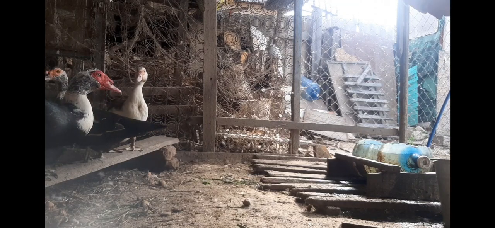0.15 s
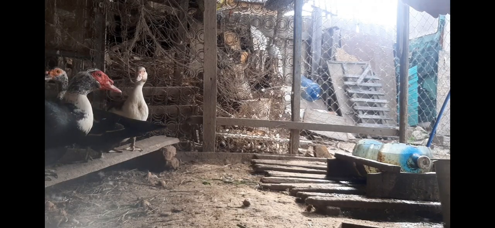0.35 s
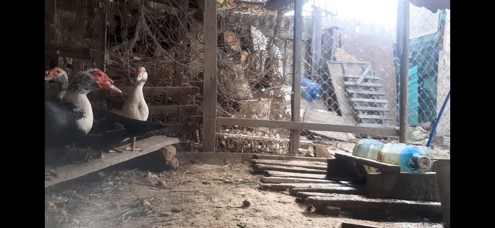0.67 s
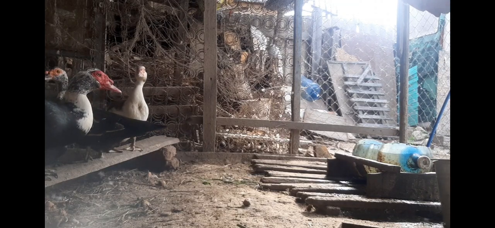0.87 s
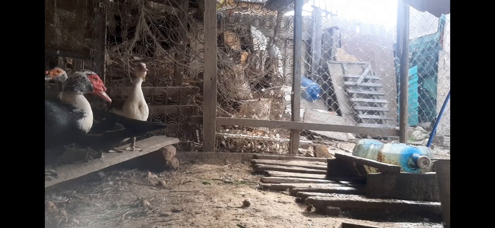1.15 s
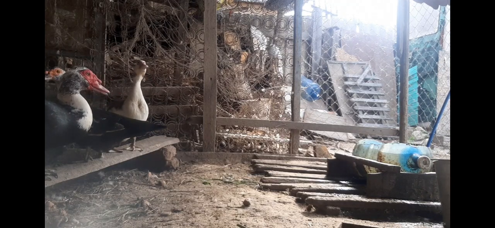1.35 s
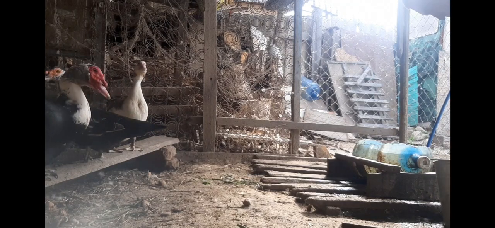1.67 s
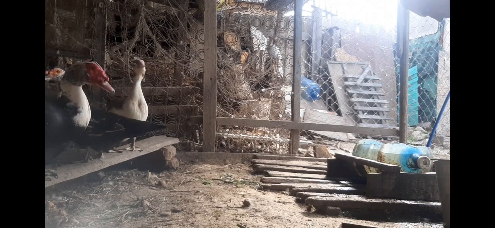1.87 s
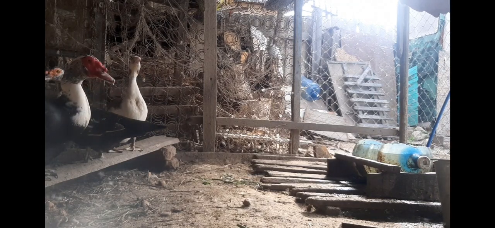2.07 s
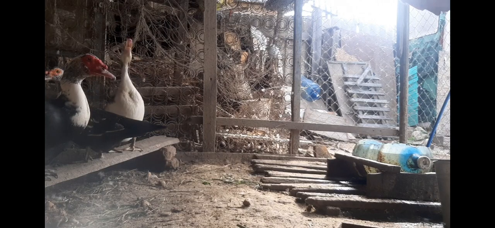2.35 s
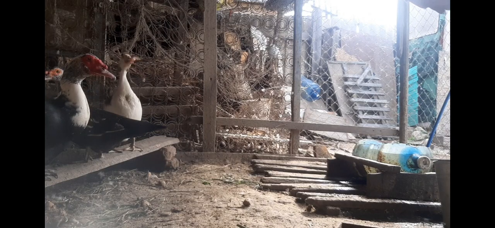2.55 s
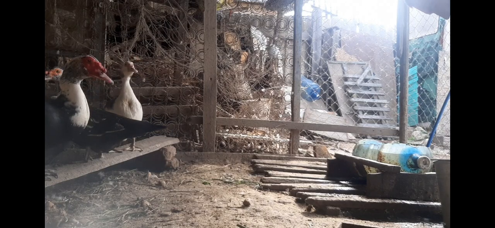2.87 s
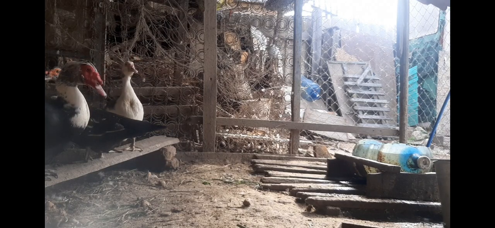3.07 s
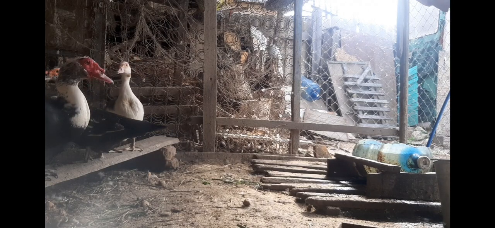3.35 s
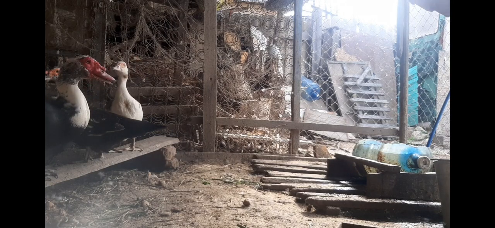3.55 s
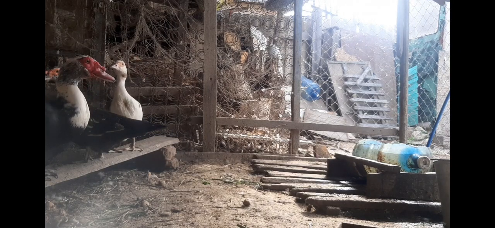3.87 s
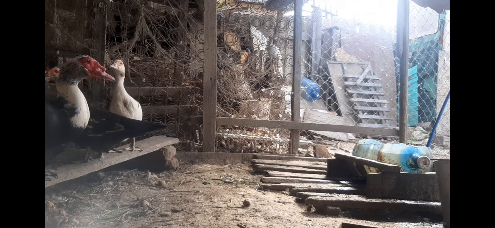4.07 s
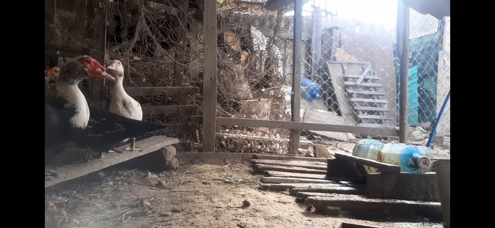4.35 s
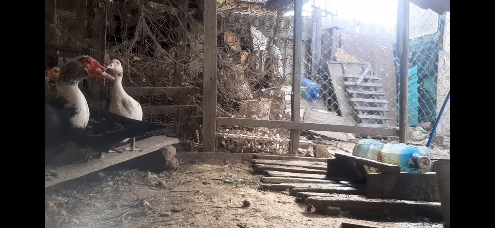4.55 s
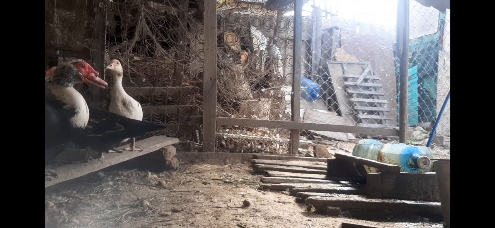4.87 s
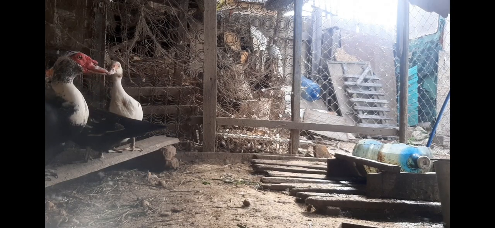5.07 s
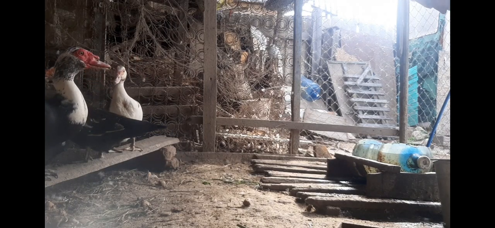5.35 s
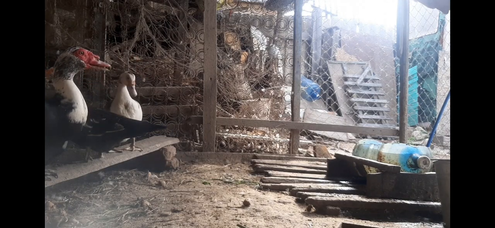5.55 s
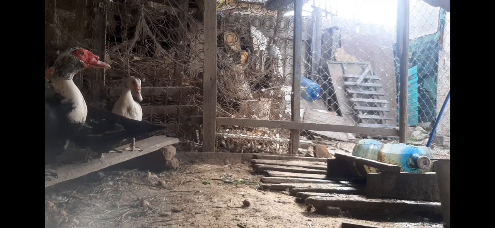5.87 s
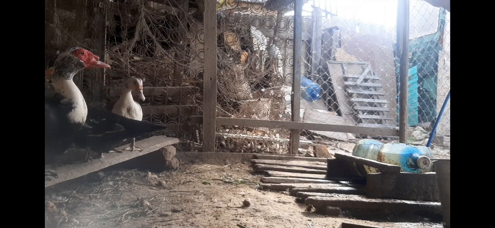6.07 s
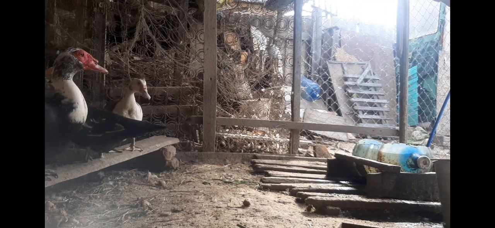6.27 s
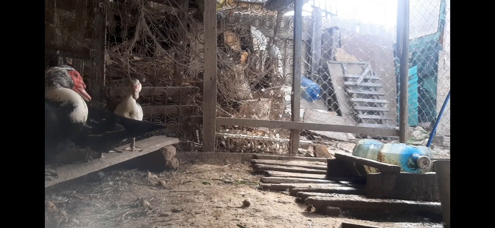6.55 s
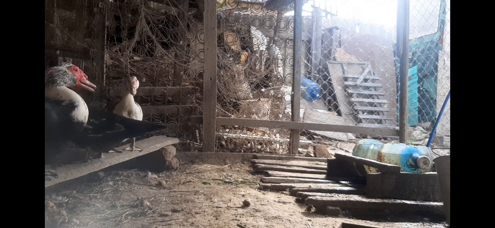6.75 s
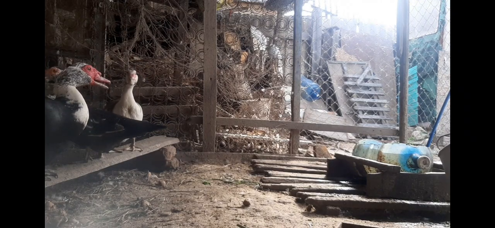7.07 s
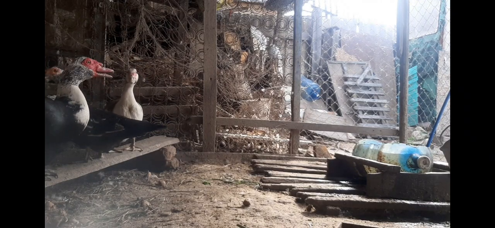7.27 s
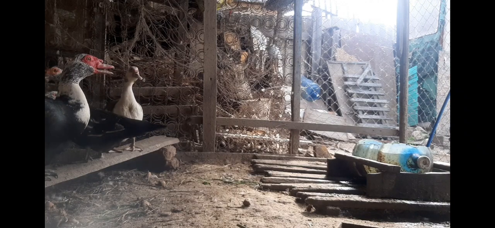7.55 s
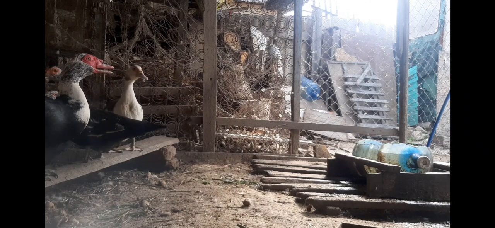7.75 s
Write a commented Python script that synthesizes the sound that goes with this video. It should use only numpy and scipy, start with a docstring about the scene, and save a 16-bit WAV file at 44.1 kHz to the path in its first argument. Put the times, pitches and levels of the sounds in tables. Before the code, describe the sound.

Close by, slightly right, a scoop stirs dry animal feed in a plastic tub: uneven gritty swishes, crunches and dull knocks, with tiny stray kernel ticks. After a quieter middle and a soft floor thump, five hollow raps on the rim end it, the last four much louder. Faint bird-like peeps and a distant low rumble sit behind. Stereo pickup in a small, dry wooden shed.

```python
"""Inside a wooden shed, feed is stirred by hand in a plastic tub close by, a little right of the microphones.
Noise-like clicks make the grain that slides and crunches with the strokes and settles after raps;
short noisy rings are stray kernels. The scoop knocks the tub, then raps its rim five times:
decaying wall modes with a slap and a crack. The floor thumps once in slow sines; narrow noise makes
faint peeps and low murmurs. Low noise rumbles and a wavering sine pair hums far off beneath it all."""
import sys
import numpy as np
from scipy import signal
from scipy.fft import rfft, irfft
from scipy.io import wavfile

SR = 44100
rng = np.random.default_rng(int(sys.argv[2]) if len(sys.argv) > 2 else 0)


def generate_wav(sig):
    """Save sig (samples, or channels by samples) to the path in sys.argv[1] as 16-bit PCM at SR."""
    pcm = np.round(np.clip(np.atleast_2d(sig).T, -1, 1) * 32767).astype(np.int16)
    wavfile.write(sys.argv[1], SR, pcm)


N = 348816

# low outdoor rumble over time: (t/s, rms level/dB)
RUMBLE_LEVEL = [(0, -56.5), (1.43, -62.5), (1.94, -57.5), (2.58, -63), (3.33, -58), (4.85, -57), (5.0, -54),
                (5.48, -53), (5.86, -60.5), (6.28, -58.5), (6.96, -57), (7.53, -53.5), (7.91, -51)]
# rumble spectrum: (f/Hz, level/dB per Hz)
RUMBLE_TONE = [(20, -63), (32, -39), (42, -1), (52, 3), (70, 5.5), (100, 1.5), (125, -7), (200, -23),
               (400, -69)]
# hum of a far machine: (t/s, centre f/Hz, rms level/dB, rms level of its octave/dB)
FAR_HUM = [(0, 48, -58, -62), (.8, 48, -57.5, -56.5), (.9, 48.03, -57, -69), (1.45, 47.95, -60, -68),
           (1.78, 48.96, -58, -58), (1.98, 49, -66, -68), (2.5, 49, -60.5, -67), (3.74, 49, -55.5, -67),
           (3.96, 51, -62, -70), (4.7, 49, -63, -65), (5.0, 49, -51.5, -58.5), (5.6, 49.5, -55, -59),
           (6.3, 51.06, -57.5, -71.5), (6.69, 52.06, -63, -74), (7.23, 52, -52.5, -64),
           (7.91, 52, -57, -66)]
# feed trickling between the swells: (t/s, grain level/dB, low crunch against grain/dB)
TRICKLE = [(0, -50, 9.5), (.6, -57.5, 3.5), (.85, -55, -14.5), (1.25, -52.5, -6.5), (1.42, -56.5, -5.5),
           (1.9, -54, 2), (2.42, -58.5, 0), (2.55, -52.5, -18), (3.2, -56.5, -2), (3.35, -53, -3),
           (3.6, -58.5, 2), (3.8, -52, -1.5), (4.2, -54.5, -8.5), (4.8, -55, -0.5), (4.93, -53, -1.5),
           (5.75, -56.5, -1), (5.9, -53, -6.5), (6.4, -54, -3), (6.72, -56, -1), (7.1, -58.5, 4),
           (7.43, -55.5, -1.5), (7.85, -54, 3.5)]
# swells of sliding feed: strokes, and feed settling after the raps: (t at full strength/s, rise/s,
# hold/s, fall/s, grain level/dB, low crunch against grain/dB)
SLIDES = [(0.064, 0.11, .01, 0.075, -35.5, -19), (0.327, 0.13, 0.13, 0.055, -41, 0),
          (0.538, 0.03, 0.0084, 0.033, -41, -3), (0.713, 0.14, .02, 0.22, -51, -2),
          (1.11, 0.11, 0.012, 0.058, -58.5, 13), (1.624, 0.042, 0.023, 0.22, -46, -3.5),
          (1.76, 0.054, 0.0068, 0.03, -34.5, -10), (1.82, .05, 0.054, 0.21, -54, 4),
          (2.043, 0.059, .06, 0.17, -46, -2), (2.173, 0.24, 0.023, 0.079, -42, -1.5),
          (2.292, 0.039, .01, 0.084, -51, -6), (2.65, 0.081, 0.0092, 0.11, -52, 7.5),
          (2.771, 0.016, 0.031, 0.095, -37, -4.5), (2.943, 0.084, .02, 0.16, -48, 2),
          (3.096, 0.14, 0.014, 0.04, -41, -7.5), (3.469, 0.082, 0.013, 0.1, -44.5, 2.5),
          (3.98, 0.053, .01, 0.22, -47.5, 5), (4.466, 0.13, 0.047, 0.13, -42.5, -6),
          (5.007, .02, .02, 0.13, -43.5, 1), (5.051, 0.037, .01, 0.098, -35, -8),
          (5.2, .1, 0.11, .15, -48, -3), (5.419, 0.088, 0.089, 0.07, -37, -6.5),
          (5.583, 0.11, 0.023, 0.061, -51.5, 6.5), (5.955, 0.025, .01, 0.094, -48.5, 0),
          (6.038, .06, 0.018, 0.14, -48.5, -13), (6.688, 0.084, 0.033, 0.075, -55.5, 7.5),
          (6.964, 0.16, 0.013, 0.096, -48.5, 0.5), (7.184, 0.037, 0.017, 0.034, -54.5, 14),
          (7.29, 0.028, 0.014, 0.049, -56.5, -12), (7.398, .05, 0.022, 0.036, -49, 10.5),
          (7.62, 0.081, 0.024, 0.049, -52.5, 12), (7.9, 0.16, .02, .1, -55, 15)]
# spectrum of the sliding feed: (f/Hz, level/dB per Hz)
GRAIN_TONE = [(100, -47), (250, -13.5), (500, -11.5), (1000, -6), (1600, -7.5), (2400, -1.5), (3500, -2.5),
              (5500, -3), (9000, -6), (16000, 1.5)]
# modes of the tub wall: (f/Hz, base level/dB, base t60/s)
TUB_MODES = [(153.5, -9, 0.073), (202, -9, 0.059), (275.6, -6, 0.06), (338.4, -3.5, 0.054),
             (393, 0.5, 0.048), (449, 3, 0.023), (588, -5, 0.051), (690, 2.5, 0.041), (894, 7, 0.014),
             (1012, -10.5, 0.11), (1094, -3.5, 0.043), (1381, 2, 0.012), (1534, 4.5, 0.026),
             (1790, -25, 0.042), (2037, 3.5, 0.027), (2350, -1, 0.024), (2624, 3, 0.013),
             (3114, -11, 0.062), (3433, 1, 0.03), (4300, 14, 0.026), (4320, -11, 0.03), (4800, -2, 0.03),
             (5400, -10, 0.025), (5800, -18, .04)]
# scoop on the tub: (t/s, level/dB, favoured f/Hz, far low modes/dB, middle modes/dB, crack/dB,
# ring-time factor, left against right/dB)
KNOCKS = [(.058, -20, 330, -18, -17, -25.5, 0.78, -3), (.337, -37.5, 700, -16, 3.5, -4.5, 0.39, -1),
          (.536, -33.5, 1000, -19, 1, -11, 0.46, -1.5), (1.021, -46, 1010, -23, -2, -26, 0.8, -5),
          (1.096, -37.5, 1082, -10, -3.5, -35, 0.61, -6), (1.594, -27, 402, -31, -20.5, -28.5, 0.98, -7),
          (1.715, -38.5, 369, -14, -8, -8, 0.86, -3), (1.752, -18, 322, -18.5, -13, -25, 0.81, -5.5),
          (2.292, -46, 611, -15, -3, -11.5, 0.86, -1), (2.473, -63, 660, -10, -14, -18, 0.52, -3),
          (2.628, -50, 685, -7, -13, -8, 0.97, 1), (2.761, -38, 690, 5.5, -1, -11, 0.44, -4),
          (2.782, -17, 328, -30, -18.5, -33, 0.66, -5.5), (3.426, -31.5, 340, -11, -10, -19.5, 0.47, -2),
          (3.969, -41, 695, -3, -20, -10.5, 1, -2), (4.983, -22, 398, -8, -13.5, -21.5, 0.75, -4.5),
          (5.068, -31, 337, -26, -18, -28, 0.86, -3), (5.394, -25, 416, -14, -10, -27, 0.6, -6),
          (5.952, -42.5, 510, -8.5, 2, -1, 0.8, -5), (6.24, -50.5, 288, -19, -26, -8, 0.87, -1),
          (6.717, -49, 900, -24, -5, -33, 0.92, -2), (6.913, -25, 640, -2, -10, -25, 0.76, -4),
          (7.12, -11.5, 448, -9, -11.5, -21, 0.83, -4), (7.335, -7, 467, -7.5, -15, -27, 0.71, -2.5),
          (7.551, -9, 474, -9, -8.5, -22, 0.75, -2), (7.778, -5.5, 1140, -11, -7, -31, 0.53, -2)]
# lone kernels, short noisy rings each at one pitch: (t/s, f/Hz, peak level/dB)
PINGS = [(.72, 680, -45.5), (.87, 1338, -48), (1.323, 4780, -46), (1.533, 3316, -47), (1.936, 3150, -44),
         (2.081, 1010, -38.5), (2.125, 2120, -39.5), (2.472, 3100, -43), (2.649, 1540, -46),
         (3.066, 1540, -38.5), (3.18, 2090, -43), (3.311, 3620, -45.5), (3.35, 3404, -43.5),
         (3.484, 1330, -45), (3.875, 732, -48), (4.33, 680, -48), (4.869, 1291, -46), (5.39, 2248, -34),
         (5.41, 2500, -34), (5.44, 1540, -36), (5.445, 2100, -39), (5.486, 1540, -33), (5.495, 2300, -37),
         (6.111, 590, -43), (6.246, 3500, -46), (6.714, 3170, -35)]
# faint hoarse peeps and low murmurs, narrow noise swells:
# (t/s, length/s, centre f/Hz, rms level before its swell/dB)
PEEPS_AND_MURMURS = [(0.755, .04, 2600, -54.5), (1.015, 0.047, 1700, -53), (1.421, .08, 1950, -59),
                     (6.026, .06, 1147, -52.5), (6.192, .04, 1800, -55.5), (1.47, 0.089, 3350, -62),
                     (2.515, 0.032, 3700, -49), (3.31, .07, 3600, -68), (4.8, .06, 3890, -54),
                     (5.57, 0.08, 3770, -48), (5.685, 0.032, 3310, -52.5), (5.82, .03, 3600, -61),
                     (5.865, 0.06, 3600, -51.5), (6.27, 0.026, 3220, -62), (6.95, 0.046, 3400, -53),
                     (7.29, .03, 3450, -52), (7.64, .04, 2800, -50), (7.86, 0.058, 2900, -48)]
# dull thumps through the floor: (t/s, f/Hz, level/dB)
THUMPS = [(6.459, 71.2, -33), (6.49, 68.4, -19.5), (6.526, 83, -24.5)]
# microphone response: (f/Hz, level/dB)
MIC_RESPONSE = [(20, 1), (6200, 3), (7200, -3.5), (7900, -15.5), (8600, -43.5), (9500, -22.5),
                (11000, -14.5), (13000, -12.5), (15000, -14), (22050, -33)]

LEFT_DB, LEFT_LAG = -6, 8   # left port against the right: level/dB, delay/samples
SHED_T60_S, SHED_LEFT_DB = 0.13, -4   # reflections: decay, left port against the right
KNOCK_SHED_DB = 1.5   # reflections against the direct knock
RUMBLE_WAVER_DB, RUMBLE_WAVER_HZ = 1.0, 5
HUM_WAVER_DB, HUM_WAVER_HZ = 2.5, 1.22   # spread of level and of pitch
SWELL_DB = 15   # a slide gains this over its rise and loses it over its fall
TRICKLE_WAVER_DB, CRUNCH_WAVER_DB = 1.2, 2.2
PATCHY_DB = 1.8   # spread of each grain band's own swelling
WALL_HUM_DB = -17   # middle wall modes under the sliding grain, against the grain
SPLIT_HZ = 29   # roughness: random spread of each blow's twin-mode offset at 500 Hz
FAINT_PINGS_PER_S, FAINT_PING_DB = 16, -49   # random pings: rate, loudest level
PING_CYCLES, SKITTER_S = 60, 0.0082   # longest ring (t60) in cycles, fade of the skitter
PEEP_WIDTH = 0.1   # share of the pitch, to either side
CUTOFF_HZ = 15700


def from_db(db):
    """Decibels to gain."""
    return 10 ** (np.asarray(db) / 20)


def rms_one(x):
    """Scale to rms 1."""
    return x / np.sqrt(np.mean(np.square(x)) + 1e-20)


def in_time(rows):
    """Columns of a time curve, joined by straight lines to one value per sample."""
    s, *columns = np.transpose(rows)
    return [np.interp(np.arange(N) / SR, s, c) for c in columns]


def drift(rate):
    """Slow chance of rms 1: noise through two low-pass poles at the rate (Hz)."""
    r = np.exp(-2 * np.pi * rate / SR)
    wander = signal.lfilter([1], [1, -2 * r, r * r], rng.standard_normal(N + SR))
    return rms_one(wander[SR:])


def colour(x, points):
    """Causal (minimum-phase) filter through (f/Hz, level/dB) points."""
    hz, db = np.transpose(points)
    grid = np.linspace(1, SR / 2, 4097)
    log_gain = np.interp(np.log(grid), np.log(hz), db) * np.log(10) / 20
    cepstrum = irfft(log_gain)
    # fold the cepstrum onto positive time
    cepstrum[1:4096] *= 2
    cepstrum[4097:] = 0
    response = irfft(np.exp(rfft(cepstrum)))
    return signal.oaconvolve(x, response[None], axes=-1)[:, :N]


def band(x, low_hz, high_hz):
    """Band-pass."""
    return signal.sosfilt(signal.butter(2, [low_hz, high_hz], "band", fs=SR, output="sos"), x)


def ring(clicks, hz, t60):
    """Two-pole resonance: a unit click sets a decaying sine of starting height 1 ringing."""
    r, w = from_db(-60 / (t60 * SR)), 2 * np.pi * hz / SR
    return signal.lfilter([0, np.sin(w)], [1, -2 * r * np.cos(w), r * r], clicks + 1e-18)


def placed(x):
    """The source is nearer the right port: the left one hears it later and softer."""
    return np.array([from_db(LEFT_DB) * np.roll(x[0], LEFT_LAG), x[1]])


def shed(x, wet_db):
    """Dense reflections off planks and clutter, different at each port, weak and alike in the bass."""
    t = np.arange(SR // 3) / SR
    noise = rng.standard_normal((3, len(t)))
    shared = from_db(-7.5) * band(noise[0], 120, 607)
    own = band(noise[1:], 690, 13800)
    decay = from_db(-60 * t / SHED_T60_S) * (1 - np.exp(-t / 0.0014))
    echoes = (shared + own) * decay
    echoes = echoes / np.sqrt(np.sum(echoes ** 2, axis=1, keepdims=True))
    gain = from_db(wet_db + np.array([[SHED_LEFT_DB], [0]]))
    return gain * signal.oaconvolve(x, echoes, axes=-1)[:, :x.shape[1]]


def rumble():
    """Low outdoor noise that swells and sinks, and a far hum with its octave, nearly alike at both ports."""
    mid, side = rms_one(colour(rng.standard_normal((2, N)), RUMBLE_TONE))
    level = from_db(in_time(RUMBLE_LEVEL)[0] + RUMBLE_WAVER_DB * drift(RUMBLE_WAVER_HZ))
    hz, low_db, octave_db = in_time(FAR_HUM)
    phase = 2 * np.pi * np.cumsum(hz + HUM_WAVER_HZ * drift(2.9)) / SR
    low = from_db(low_db + HUM_WAVER_DB * drift(4.0)) * np.sin(phase)
    octave = from_db(octave_db + HUM_WAVER_DB * drift(4.0)) * np.sin(2 * phase)
    mid = level * mid + np.sqrt(2) * (low + octave)   # root 2 turns rms into sine height
    left = from_db(-2.5) * (mid + 0.03 * level * side)
    right = mid - 0.073 * level * side
    return np.array([left, right])


def sliding_levels():
    """Gains of grain and crunch: the powers of a wavering trickle and of each slide's swell, hold, fall add."""
    t = np.arange(N) / SR
    trickle_db, crunch_db = in_time(TRICKLE)
    grain = from_db(2 * (trickle_db + TRICKLE_WAVER_DB * drift(16.0)))
    crunch = grain * from_db(2 * crunch_db)
    for s, rise, hold, fall, db, low_db in SLIDES:
        start = max(round((s - 3 * rise) * SR), 0)
        near = slice(start, round((s + hold + 3 * fall) * SR))
        before = (s - t[near]) / rise
        after = (t[near] - s - hold) / fall
        away = np.maximum(np.maximum(before, after), 0)   # 0 during the hold
        power = from_db(2 * (db - SWELL_DB * away))
        grain[near] += power
        crunch[near] += power * from_db(2 * low_db)
    return np.sqrt(grain), np.sqrt(crunch) * from_db(CRUNCH_WAVER_DB * drift(7.8))


def grains(per_s, spread_db):
    """Kernels click at random moments, in uneven size and either sign; rms 1."""
    sizes = from_db(spread_db * np.minimum(rng.exponential(1, N), 5)) * rng.choice([-1, 1], N)
    return rms_one(sizes * (rng.random(N) < per_s / SR))


def patchy(rattle):
    """Each band of the rattle swells and sinks a little on its own; rms 1."""
    edges = np.geomspace(110, 19000, 12)
    total = 0
    for k in range(11):
        sign = (-1) ** k   # neighbouring bands join without a dip
        total = total + sign * from_db(PATCHY_DB * drift(14.0)) * band(rattle, edges[k], edges[k + 1])
    return rms_one(total)


def wall_crunch():
    """Kernels drag on the wall: sparse clicks ring each mode below 3500 Hz for a shortened time; rms 1."""
    return rms_one(sum(from_db(db) * ring(grains(140, 2.95), hz, 0.52 * t60)
                       for hz, db, t60 in TUB_MODES if hz < 3500))


def wall_hum(around):
    """The rattle at each port keeps the strong middle wall modes humming, each wavering; rms 1."""
    modes = [(hz, db) for hz, db, _ in TUB_MODES if 1000 < hz < 2500 and db > 0]
    return rms_one([sum(from_db(db + 3.0 * drift(4.0)) * ring(side, hz, .12) for hz, db in modes)
                    for side in around])


def feed():
    """Kernels rattle over each other (bright) and drag on the wall, which hums in its modes."""
    grain, crunch = sliding_levels()
    near, *around = colour(np.array([grains(6000, 2.0) for _ in range(3)]), GRAIN_TONE)
    # the hand keeps moving, so the reflected rattle is ever new at each port; the bass stays alike
    around = np.array(around)
    rattle = placed([near, near]) + from_db(8.5) * band(around, 410, 20100)
    sliding = from_db(4.0) * grain * (patchy(rattle) + from_db(WALL_HUM_DB) * wall_hum(around))
    wall = from_db(-6.0) * crunch * wall_crunch()
    wall = np.array([wall, wall])
    return sliding + placed(wall) + shed(wall, -0.81)


def knocks():
    """Each blow favours the modes near where it lands, cracks, and meets the shed from a new spot."""
    t, out = np.arange(SR // 2) / SR, np.zeros((2, N + SR))
    hz, mode_db, t60 = np.array(TUB_MODES).T[:, :, None]
    for s, level_db, favoured_hz, far_db, middle_db, crack_db, ring_time, pan_db in KNOCKS:
        near_db = -24.0 * np.abs(np.log2(hz / favoured_hz))
        floor_db = np.select([hz < 800, hz < 2900], [far_db, middle_db], crack_db - 1.5)
        share_db = np.maximum(near_db, floor_db) + 2 * rng.standard_normal(hz.shape)
        # a twin beside each mode, drawn anew for every blow, roughens it
        twin_hz = hz + SPLIT_HZ * rng.standard_normal(hz.shape) * np.sqrt(hz / 500)
        pair = np.sin(2 * np.pi * hz * t) + 0.44 * np.sin(2 * np.pi * twin_hz * t)
        rings = from_db(mode_db + share_db - 60 * t / (ring_time * t60)) * pair
        modes = rings[::2].sum(axis=0) - rings[1::2].sum(axis=0)   # alternate signs
        # the feed slaps the wall and loose kernels jump off it for a few milliseconds
        noise = rng.standard_normal((2, len(t)))
        slap = from_db(middle_db + 14 - 60 * t / 0.023) * band(noise[0], 540, 2200)
        crack = from_db(crack_db + 20.5 - 60 * t / 0.053) * band(noise[1], 2750, 22000)
        crack = crack * (1 - np.exp(-t / 0.0026))
        # the contact builds over two milliseconds
        blow = (modes + slap + crack) * (1 - np.exp(-(t / 0.0022) ** 2))
        # allow for the level step that placed() adds
        blow = from_db(level_db + (pan_db - LEFT_DB) * np.array([[.5], [-.5]])) * blow
        at = round(s * SR)
        out[:, at:at + len(t)] += placed(blow) + shed(blow, KNOCK_SHED_DB)
    return out[:, :N]


def faint_pings():
    """Stray kernels at random moments, pitches (600 to 4800 Hz) and levels (down to 8 dB softer)."""
    gap, pitch, softness = rng.random((300, 3)).T
    times = np.cumsum(-np.log(gap)) / FAINT_PINGS_PER_S
    rows = zip(times, 600 * 8 ** pitch, FAINT_PING_DB - 8 * softness)
    return [row for row in rows if row[0] < N / SR]


def pings():
    """A kernel skitters on the wall for some milliseconds: a noise burst makes a short ring at one pitch."""
    t, out = np.arange(SR // 5) / SR, np.zeros((2, N + SR))
    for s, hz, db in PINGS + faint_pings():
        skitter = rng.standard_normal(len(t)) * (1 - np.exp(-t / 0.0024)) * np.exp(-t / SKITTER_S)
        ping = ring(skitter, hz, min(PING_CYCLES / hz, .02))
        ping = from_db(db) * np.array([ping, ping]) / np.abs(ping).max()
        at = round(s * SR)
        out[:, at:at + len(t)] += placed(ping) + shed(ping, -0.4)
    return out[:, :N]


def peeps_and_murmurs():
    """Narrow, flickering noise that swells and fades, unlike at the two ports."""
    t, out = np.arange(SR // 5) / SR, np.zeros((2, N + SR))
    for s, length, hz, db in PEEPS_AND_MURMURS:
        noise = rng.standard_normal((2, len(t)))
        noise = rms_one(band(noise, hz * (1 - PEEP_WIDTH), hz * (1 + PEEP_WIDTH)))
        swell = np.sin(np.pi * np.minimum(t / length, 1))
        at = round(s * SR)
        out[:, at:at + len(t)] += from_db(db) * swell * noise
    return out[:, :N]


def thumps():
    """The boards swing a few slow cycles: soft-edged, decaying low sines."""
    t, out = np.arange(SR // 2) / SR, np.zeros(N + SR)
    for s, hz, db in THUMPS:
        envelope = from_db(db - 60 * t / 0.16) * (1 - np.exp(-t / 0.012))
        at = round(s * SR)
        out[at:at + len(t)] += envelope * np.sin(2 * np.pi * hz * t)
    return placed([out[:N], out[:N]])


def scene():
    """Tub in the shed over the rumble, with faint peeps and murmurs."""
    return rumble() + feed() + knocks() + pings() + peeps_and_murmurs() + thumps()


def record(dry):
    """Microphone colour with its deep treble dip, then the steep cut at the top."""
    top_cut = signal.cheby2(12, 60, 1.04 * CUTOFF_HZ, fs=SR, output="sos")
    return signal.sosfilt(top_cut, colour(dry, MIC_RESPONSE))


dry = scene()
out = record(dry)
generate_wav(out)
```